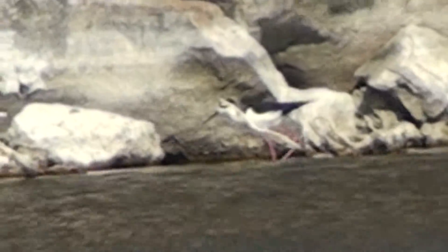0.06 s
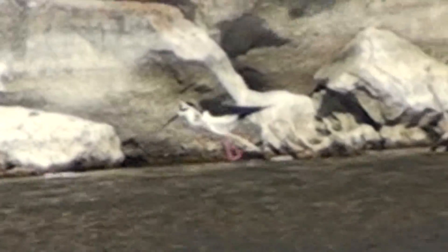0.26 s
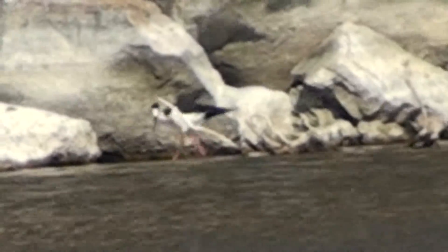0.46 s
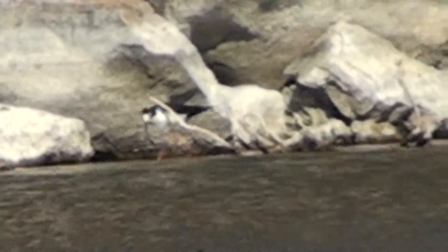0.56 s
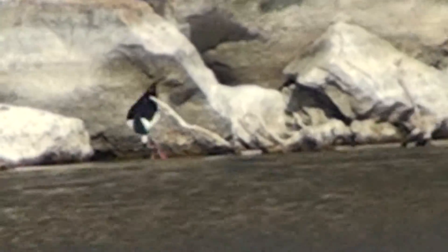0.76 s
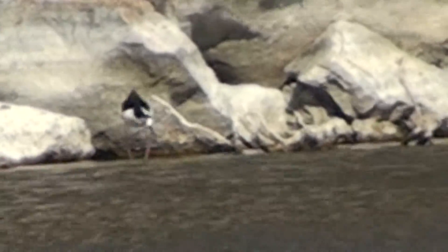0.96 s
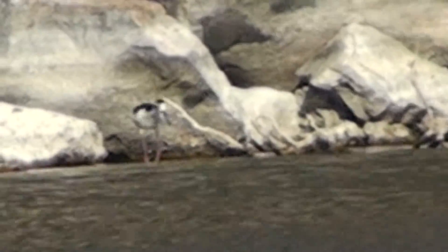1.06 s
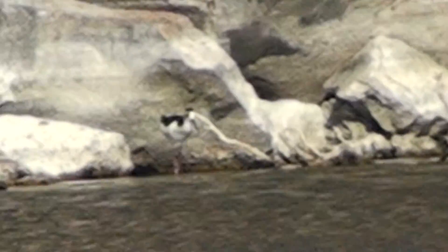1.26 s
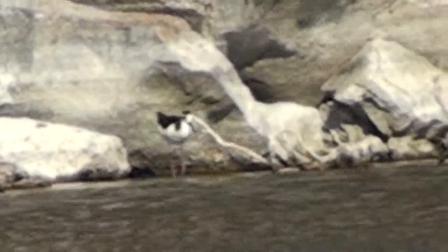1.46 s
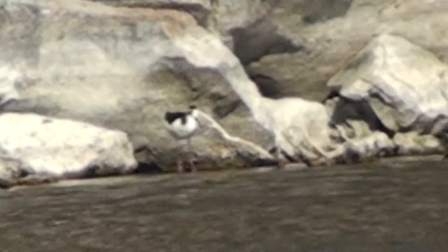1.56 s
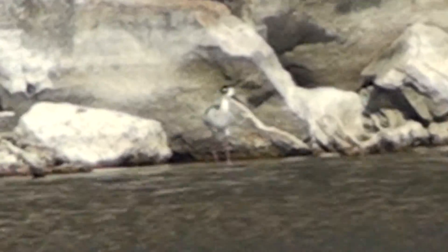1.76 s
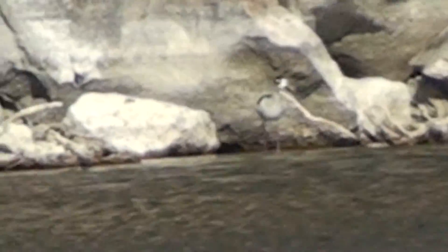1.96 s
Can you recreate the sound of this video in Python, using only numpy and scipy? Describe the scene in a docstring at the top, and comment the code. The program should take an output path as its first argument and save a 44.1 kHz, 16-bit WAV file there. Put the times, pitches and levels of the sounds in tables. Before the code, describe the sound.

One close, raspy bird call ends in a squeal, with faint water and wind behind.

```python
"""Beside a pond, one harsh rasping call sounds close by and a little to the left.
The voice is a train of quick pulses, each with a puff of air. It starts as a stuttering
creak, swells into a fluttering rasp as the pulses bunch up, and ends in a short rising squeal.
Water laps and splashes faintly behind it, and a little wind rumbles on the microphone."""
import sys
import numpy as np
from scipy import signal
from scipy.fft import rfft, irfft
from scipy.io import wavfile
from scipy.ndimage import uniform_filter1d

SR = 44100
rng = np.random.default_rng(int(sys.argv[2]) if len(sys.argv) > 2 else 0)


def wav_out(sig):
    """Save sig, one row per channel (or a flat mono array), as 16-bit PCM at SR to the path in sys.argv[1]."""
    wavfile.write(sys.argv[1], SR, np.round(np.clip(np.atleast_2d(sig).T, -1, 1) * 32767).astype(np.int16))


N = 88200
T = np.arange(N) / SR

# The tone colour of a hard, bright pulse. Each row: frequency in Hz, level in dB.
SNAP_SPECTRUM = [(400, -31.5), (1200, -15.5), (1900, 3.5), (2700, 4), (3700, -6), (4600, -1.5), (5400, -2),
                 (6100, -9), (7000, -10.5), (8000, -20), (9500, -32.5), (11000, -36.5), (15000, -40)]


def from_db(db):
    """Turn decibels into a number to multiply by."""
    return 10 ** (np.asarray(db) / 20)


def rms_one(x):
    """Scale a signal so that its average power is 1."""
    return x / np.sqrt(np.mean(x ** 2) + 1e-20)


def at_hz(points, hz):
    """Read between the rows of a frequency table, giving every octave equal room."""
    row_hz, values = np.transpose(points)
    return np.interp(np.log(np.maximum(hz, 1)), np.log(row_hz), values)


def envelope(rows):
    """Follow a loudness curve, with silence before and after it."""
    return from_db(np.interp(T, *np.transpose(rows), left=-140, right=-140))


def drift(rate_hz):
    """A smooth random wobble of about size 1; a higher rate wobbles faster."""
    hz = np.fft.rfftfreq(2 * N, 1 / SR)
    noise = rfft(rng.standard_normal(2 * N))
    return rms_one(irfft(noise / (1 + (hz / rate_hz) ** 2) ** 2)[:N])


def gate(start, end, edge_s):
    """Fade in at the start time and out at the end time."""
    return np.clip(np.minimum(T - start, end - T) / edge_s + .5, 0, 1)


def voiced(pulses, spectrum, window=600):
    """Give pulses a tone colour, then even out their level over a window of samples."""
    gains = from_db(at_hz(spectrum, np.fft.rfftfreq(2 * N, 1 / SR)))
    # These steps make the filter ring after each pulse and never before it.
    cepstrum = irfft(np.log(gains))
    cepstrum[1:N] *= 2
    cepstrum[N + 1:] = 0
    ringing = irfft(rfft(pulses, 2 * N) * np.exp(rfft(cepstrum)))[:N]
    power = np.abs(uniform_filter1d(ringing ** 2, size=window))
    return ringing / np.sqrt(power + 1e-12)


def airy_pulses(times, sizes, air, puff_s=.002):
    """Sharp pulses, each letting through a puff of air that swells and fades around it."""
    fine = np.zeros(4 * N)  # a finer grid lets pulses fall between samples
    slots = np.clip(times * SR * 4, 0, len(fine) - 1).astype(int)
    np.add.at(fine, slots, -sizes)
    pulses = signal.resample_poly(fine, 1, 4)
    t = np.arange(-200, 201) / SR
    puffs = signal.fftconvolve(np.abs(pulses), np.exp(-(2 * t / puff_s) ** 2), "same")
    return rms_one(pulses) + air * rms_one(puffs * rng.standard_normal(N))


def wind_and_water():
    """Wind rumble and the wash of water: bands of noise that each flicker on their own."""
    # The colour of the noise. Each row: frequency in Hz, relative level in dB.
    spectrum = [(20, -3.5), (42, -6.5), (110, -13.5), (240, -17), (400, -16), (600, -18), (1000, -19.5),
                (1300, -18.5), (1750, -19.5), (2600, -23.5), (4000, -29.5), (8000, -39.5), (15500, -43)]
    # How alike left and right are. Each row: frequency in Hz, likeness (1 means the same).
    likeness = [(60, 0.8), (180, 0.93), (550, 0.36), (1650, 0.54), (4970, 0.23), (15000, 1)]
    # The overall loudness. Each row: time in seconds, level in dB.
    loudness = [(0, -57.5), (1.35, -56), (2, -57)]
    flicker_db = 1.94
    edges = 20 * 2 ** np.arange(0, 10.1, .5)  # in Hz, half an octave apart
    white = rng.standard_normal((2, 2, N))
    wash = 0
    for k, (low, high) in enumerate(zip(edges, edges[1:])):
        band = signal.butter(2, [low, high], "band", fs=SR, output="sos")
        middle, side = signal.sosfilt(band, white[k % 2])
        hz = np.sqrt(low * high)
        alike = np.clip(at_hz(likeness, hz), -1, 1)
        stereo = np.sqrt(1 + alike) * middle + np.sqrt(1 - alike) * side * [[1], [-1]]
        wash += from_db(at_hz(spectrum, hz) + flicker_db * drift(25)) * stereo
    return from_db(np.interp(T, *np.transpose(loudness))) * rms_one(wash)


def pulse_train(pitch_rows, spread_db=2.74, stutter_db=-8.5):
    """The voice's pulses follow a pitch curve, uneven in spacing and strength."""
    seconds, hz, jitter = np.transpose(pitch_rows)
    gap_chance, size_chance = rng.standard_normal((2000, 2)).T
    t, times = 0, []
    while t < T[-1] and len(times) < len(gap_chance):
        stretch = np.exp(np.interp(t, seconds, jitter) * gap_chance[len(times)])
        times.append(t)
        t += stretch / np.interp(t, seconds, hz)
    times = np.array(times)
    # A brief stutter: two pulses in every three are weak.
    weak = (times > .26) & (times < .28) & (np.arange(len(times)) % 3 > 0)
    sizes = from_db(spread_db * size_chance[:len(times)] + stutter_db * weak)
    return airy_pulses(times, sizes, air=.49)


def creak_and_squeal():
    """One train of pulses opens and closes the call, sometimes soft and sometimes snapping."""
    # How fast the pulses come. Each row: time in seconds, pitch in Hz,
    # unevenness as a share of the gap between pulses.
    creak_pitch = [(.09, 253.2, 0.022), (.125, 557, 0.079), (.145, 650.7, 0.084), (.17, 539.8, 0.058),
                   (.215, 543.4, 0.056), (.228, 579.6, 0.06), (.275, 590.8, .05), (.29, 483.6, 0.14),
                   (.318, 455.6, 0.015), (.352, 499.3, 0.018), (.375, 527.1, .035), (.42, 544.2, .09),
                   (.48, 558.3, 0.061), (.52, 569.5, 0.068), (.56, 600.8, 0.03), (.58, 693, 0.11)]
    squeal_pitch = [(1.13, 661, 0.062), (1.15, 864, 0.076), (1.166, 576.3, 0.024), (1.178, 601.7, 0.041),
                    (1.186, 850.7, 0.049), (1.203, 619, 0.023), (1.214, 670, 0.036), (1.228, 776.2, 0.015),
                    (1.245, 773, 0.031), (1.254, 701.2, .08), (1.269, 947.3, 0.12), (1.285, 620, .25),
                    (1.305, 478.9, .35)]
    # How loud each part is. Each row: time in seconds, level in dB.
    creak_level = [(.04, -98.5), (.075, -60.5), (.115, -70.5), (.145, -53.5), (.2, -50.5), (.26, -51.5),
                   (.295, -44), (.318, -49.5), (.355, -48), (.385, -43), (.445, -46.5), (.47, -43),
                   (.495, -46.5), (.525, -44), (.57, -44), (.595, -76)]
    squeal_level = [(1.1, -65), (1.125, -40), (1.15, -49), (1.18, -41.5), (1.24, -35), (1.27, -36),
                    (1.295, -37.5), (1.312, -39.5), (1.326, -47.5)]
    # The tone colour of each part. Each row: frequency in Hz, level in dB.
    creak_spectrum = [(300, -38), (540, -9.5), (700, -2), (900, -2), (1180, -15), (1600, 1), (2000, 4),
                      (2400, 0), (2850, -3), (3500, -12.5), (5300, -12.5), (7500, -28), (10000, -54.5)]
    squeal_spectrum = [(350, -22), (720, -12.5), (1150, -15), (1600, -11.5), (1950, -2), (2320, -2),
                       (2800, -15), (3400, -11.5), (4000, -13.5), (5300, -16.5), (6500, -30), (9500, -35),
                       (11000, -50)]
    # Moments of hard, bright snapping. Each row: start and end in seconds, level in dB.
    snap_moments = [(0.064, .092, -67), (0.132, 0.139, -52.5), (0.169, 0.179, -50.5), (0.194, 0.219, -52.5),
                    (0.235, 0.275, -54.5), (0.286, 0.307, -47.5), (0.369, 0.385, -42), (.393, 0.4, -47),
                    (0.407, 0.415, -45), (.42, 0.439, -41.5), (0.46, .484, -40.5), (0.489, 0.505, -44),
                    (0.517, .532, -37.5), (0.542, 0.576, -37.5), (1.126, 1.134, -47), (1.159, 1.177, -38),
                    (1.181, 1.195, -46), (1.2, 1.213, -37), (1.223, 1.225, -32), (1.246, 1.258, -42),
                    (1.279, 1.299, -40.5)]
    pulses = pulse_train(creak_pitch + squeal_pitch)
    creak = envelope(creak_level) * voiced(pulses, creak_spectrum)
    squeal = envelope(squeal_level) * voiced(pulses, squeal_spectrum)
    snap_gain = sum(from_db(db) * gate(start, end, edge_s=.0018) for start, end, db in snap_moments)
    return creak + squeal + snap_gain * voiced(pulses, SNAP_SPECTRUM)


def splashes(wander=.07):
    """Faint splashes, each a short swell of a wavering tone."""
    # Each row: time of the peak in seconds, pitch in Hz, fade time in seconds, level in dB.
    plips = [(0.099, 2600, 0.0049, -53), (0.261, 391, 0.013, -54.5), (1.433, 1250, 0.08, -59),
             (1.565, 2700, 0.0085, -61.5), (1.676, 1320, 0.011, -55.5), (1.707, 2150, .012, -61),
             (1.735, 2200, 0.0042, -52), (1.79, 2600, 0.05, -63.5), (1.912, 1750, 0.01, -60),
             (1.931, 3600, 0.0061, -61)]
    sound = 0
    for peak, hz, fade_s, db in plips:
        swell = np.exp(-((T - peak) / fade_s) ** 2)
        pitch = hz * (1 + wander * drift(413))
        sound += from_db(db) * swell * np.sin(2 * np.pi * np.cumsum(pitch) / SR)
    return sound


def squeaks(wander=.012):
    """For an instant the voice swings smoothly and glides on three clean harmonics."""
    # Each row: start and end in seconds, first and last pitch in Hz,
    # then the levels in dB of the tones at one, two and three times that pitch.
    clear_moments = [(0.313, 0.335, 771, 700, -76, -48.5, -57), (0.322, 0.345, 885, 983, -54, -51, -53),
                     (0.346, .361, 778, 772, -78, -49, -66), (0.348, 0.381, 975, 843, -55, -51, -55),
                     (0.445, 0.462, 988, 950, -61, -67, -46), (0.465, 0.484, 904.7, 942, -57, -68, -45),
                     (0.505, 0.537, 968, 940, -55, -61, -44.5), (0.53, 0.559, 847.7, 800, -65, -48.5, -57),
                     (.553, .572, 572, 661, -51.5, -68, -52), (1.124, 1.136, 647, 704, -49, -52, -36.5),
                     (1.141, 1.162, 847, 898.6, -59, -37.5, -58),
                     (1.166, 1.183, 570, 693.2, -51.5, -67, -50),
                     (1.181, 1.204, 784.5, 792, -57, -58, -38.5), (1.229, 1.243, 772, 765, -50, -74, -44)]
    sound = 0
    for start, end, first_hz, last_hz, *levels in clear_moments:
        hz = np.interp(T, [start, end], [first_hz, last_hz]) * (1 + wander * drift(198))
        phase = 2 * np.pi * np.cumsum(hz) / SR
        tone = sum(from_db(db) * np.sqrt(2) * np.sin(k * phase) for k, db in enumerate(levels, 1))
        sound += gate(start, end, edge_s=.00674) * tone
    return sound


def rasp_tones(warble_hz=19, warble_depth=.016, flicker_db=1.5):
    """Tones sing through the rasp, wavering together and rising at its end."""
    # Each row: pitch in Hz, relative level in dB, random wander as a share of the pitch.
    tones = [(882.4, -19.5, 0.0099), (1640, -3.5, 0.0134), (2057, -16, .02), (3097, -16.5, .02)]
    warble_rate = warble_hz * (1 + .2945 * drift(14))
    warble = warble_depth * np.sin(2 * np.pi * np.cumsum(warble_rate) / SR)
    rise = 1.2 * np.clip(T - 1.11, 0, .1)  # up 12 percent in a tenth of a second
    sound = 0
    for hz, db, wander in tones:
        flicker = from_db(flicker_db * drift(120))
        pitch = hz * (1 + warble + rise + wander * drift(146))
        sound += from_db(db) * rms_one(flicker * np.sin(2 * np.pi * np.cumsum(pitch) / SR))
    return sound


def rasp():
    """At full effort the pulses break into bunches of five, and the tones throb in step."""
    # The swell and fade of the rasp. Each row: time in seconds, level in dB.
    loudness = [(.55, -72), (.58, -39), (.7, -35.5), (.9, -34.5), (1.1, -35), (1.155, -36.5), (1.185, -42),
                (1.22, -77)]
    # The tone colour of its pulses. Each row: frequency in Hz, level in dB.
    spectrum = [(300, -43.5), (550, -20), (720, -11), (900, -17), (1130, -17), (1350, -10.5), (1600, -2),
                (2020, 2), (2550, -12), (3120, -2.5), (3700, -13), (4550, -5.5), (5500, -13), (5950, -24.5),
                (6400, -23), (7800, -33), (9100, -33), (11000, -52.5)]
    flutter_hz, gap_s, jitter_s = 180.3, .00113, .00016
    cycles = np.cumsum(flutter_hz * np.exp(.06 * drift(90))) / SR
    starts = np.interp(np.arange(1, int(cycles[-1])), cycles, T)  # one bunch per cycle
    chance = rng.standard_normal((500, 2, 5))[:len(starts)]
    place = np.arange(5)
    times = starts[:, None] + gap_s * place + jitter_s * chance[:, 0]
    sizes = from_db(.1 * chance[:, 1] - place)  # each pulse in a bunch is about 1 dB weaker
    pulses = airy_pulses(times.ravel(), sizes.ravel(), air=1)
    flutter = np.sin(2 * np.pi * cycles)
    rattle = from_db(-2) * voiced(pulses, spectrum, window=160) * rms_one(1 + .21 * flutter)
    edge_db = -12.5 - 59 * np.maximum(T - .57, 0)  # the rasp starts with a bright edge that fades
    edge = from_db(edge_db) * voiced(pulses, SNAP_SPECTRUM)
    tones = rms_one(1 + .41 * flutter) * rasp_tones()
    return envelope(loudness) * (rattle + edge + tones)


def sliding_notch(voice, depth_db=-11, width_hz=770):
    """An anti-resonance (the opposite of ringing) hollows out a moving strip of the treble."""
    # Where the hollow sits. Each row: time in seconds, centre frequency in Hz.
    path = [(.5, 10300), (.65, 8677), (.85, 7740), (1.08, 7180), (1.14, 8505), (1.19, 10300), (1.29, 10900)]
    hz, seconds, frames = signal.stft(voice, SR, nperseg=256)
    centre_hz = np.interp(seconds, *np.transpose(path))
    dip = np.exp(-((hz[:, None] - centre_hz) / width_hz) ** 2)
    return signal.istft(frames * from_db(depth_db * dip), SR)[1][:N]


def reflections(call, level_db=-10.5, fade_s=.26):
    """Nearby surfaces scatter the call back briefly, differently on each side."""
    t = T[:SR // 4]
    tail = rng.standard_normal((2, len(t))) * from_db(-60 * t / fade_s) * (t > .002)
    tail /= np.sqrt(np.sum(tail ** 2, axis=1, keepdims=True))
    return from_db(level_db) * signal.fftconvolve(call[None], tail, axes=1)[:, :N]


def scene():
    """The call, a little to the left, over the sounds of the pond."""
    call = sliding_notch(creak_and_squeal() + rasp()) + squeaks()
    pan = from_db([[2.5], [-2.5]])  # left, right
    return pan * (call + reflections(call)) + wind_and_water() + splashes()


def record(dry):
    """Cut the very highest treble away steeply."""
    cutoff_hz = 15750
    return signal.sosfilt(signal.ellip(12, .2, 80, cutoff_hz, fs=SR, output="sos"), dry)


dry = scene()
out = record(dry)
wav_out(out)
```